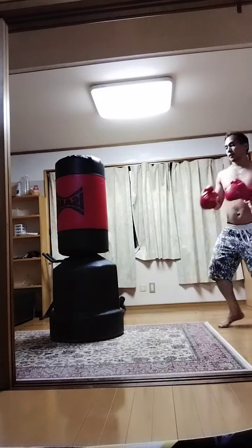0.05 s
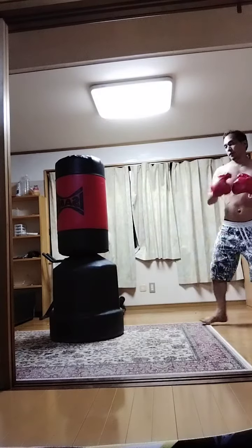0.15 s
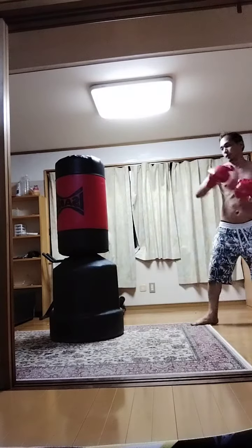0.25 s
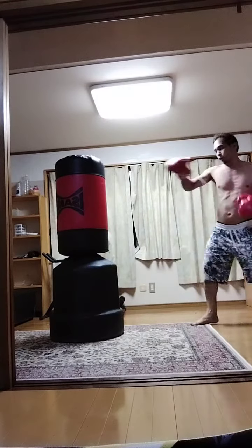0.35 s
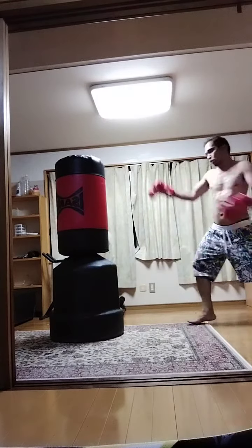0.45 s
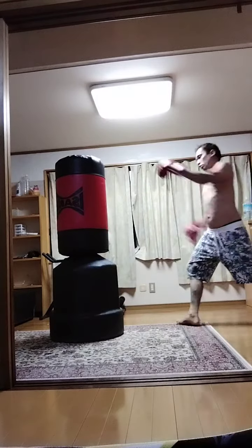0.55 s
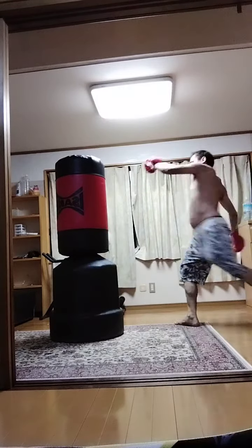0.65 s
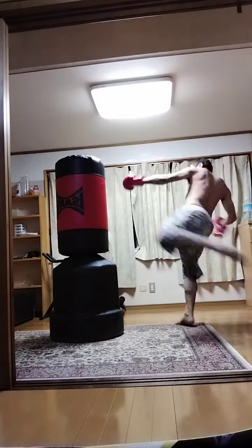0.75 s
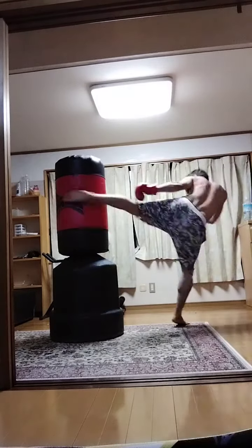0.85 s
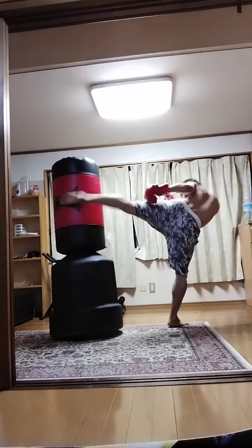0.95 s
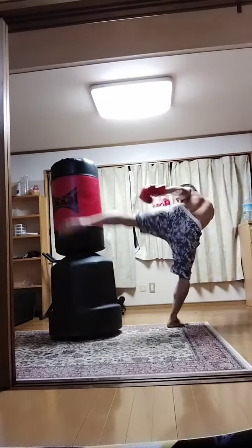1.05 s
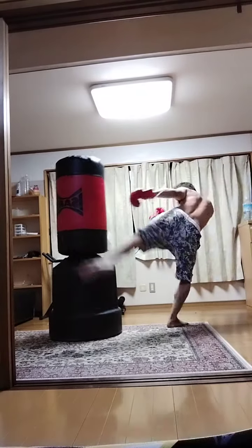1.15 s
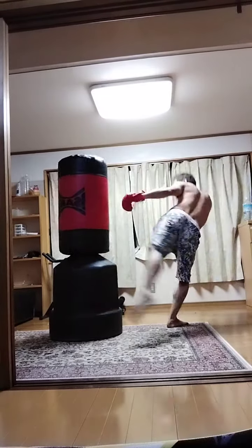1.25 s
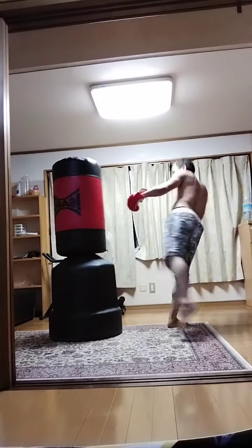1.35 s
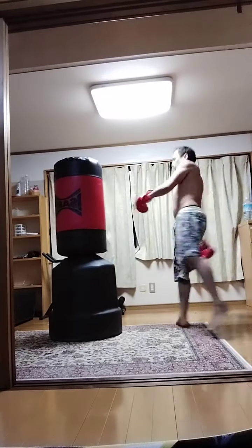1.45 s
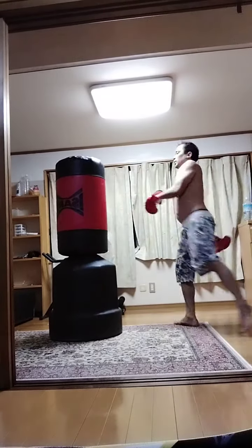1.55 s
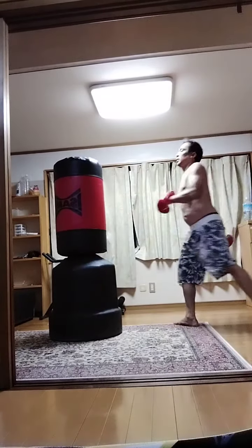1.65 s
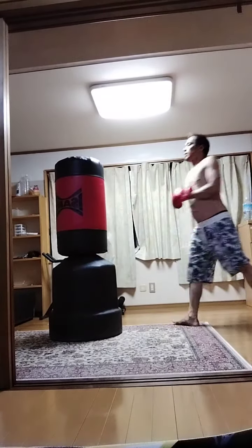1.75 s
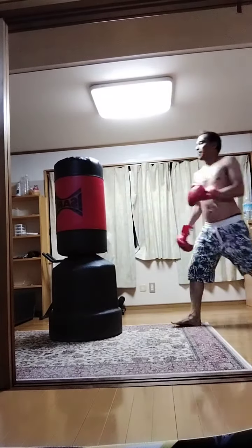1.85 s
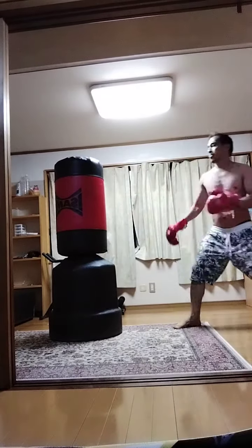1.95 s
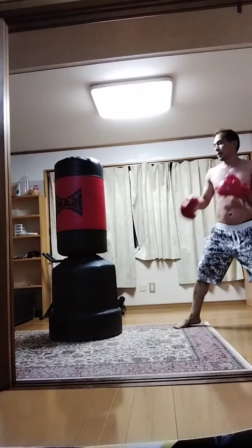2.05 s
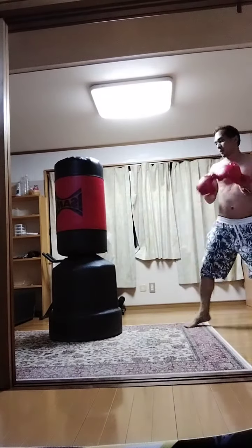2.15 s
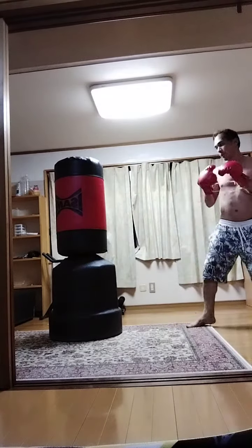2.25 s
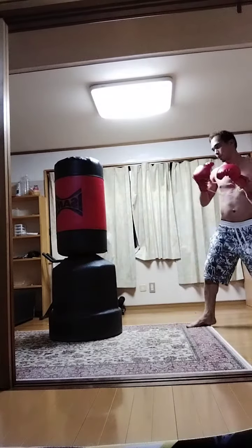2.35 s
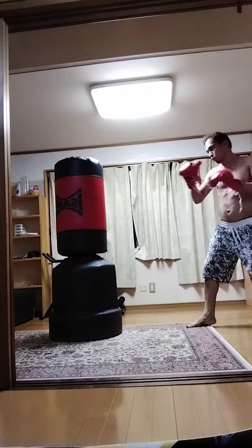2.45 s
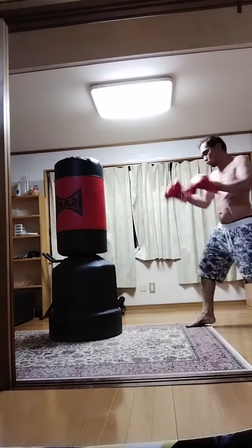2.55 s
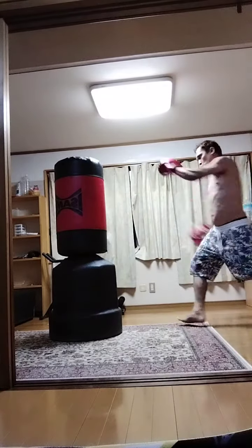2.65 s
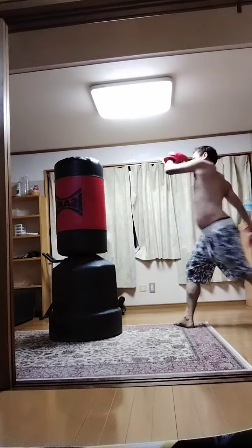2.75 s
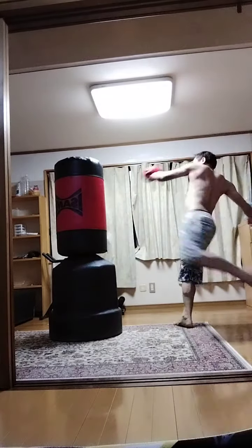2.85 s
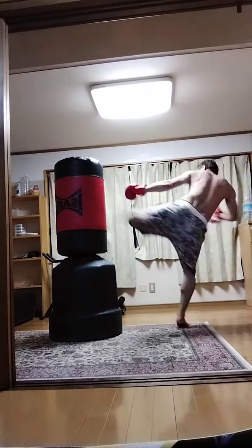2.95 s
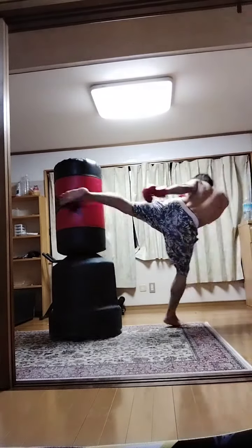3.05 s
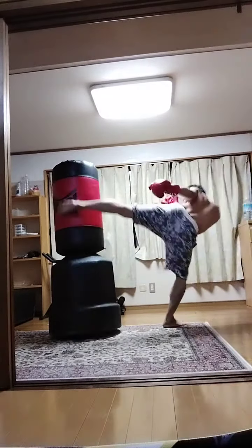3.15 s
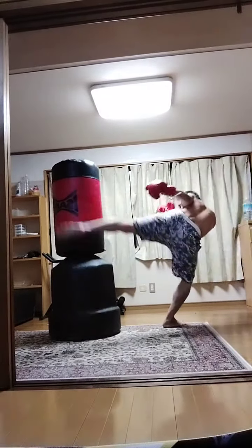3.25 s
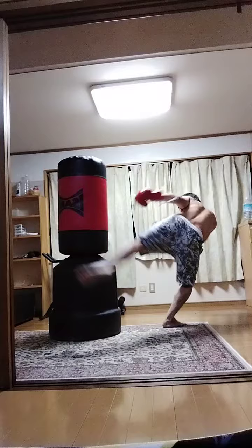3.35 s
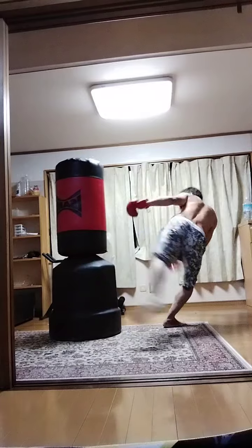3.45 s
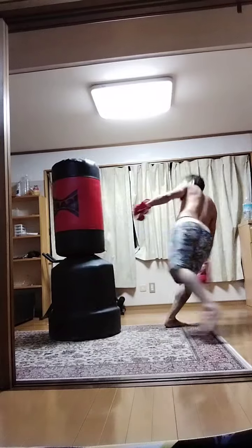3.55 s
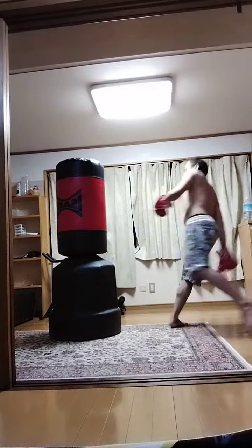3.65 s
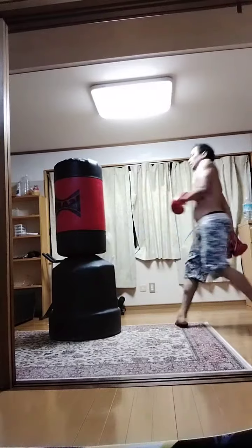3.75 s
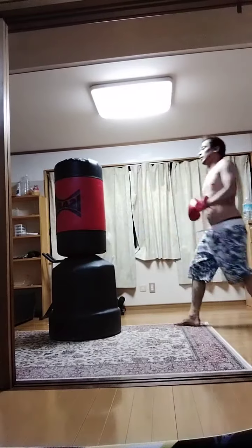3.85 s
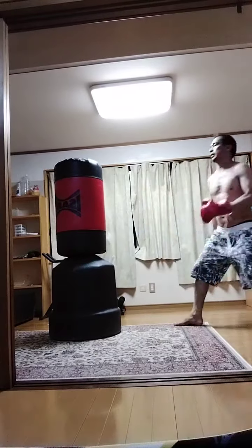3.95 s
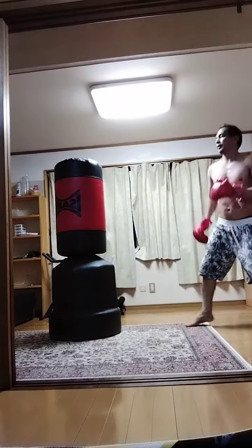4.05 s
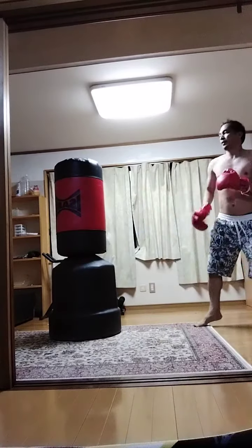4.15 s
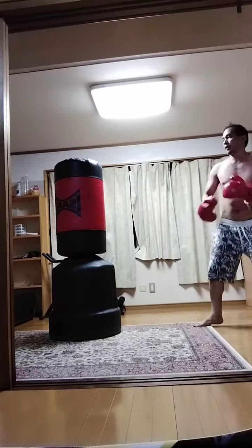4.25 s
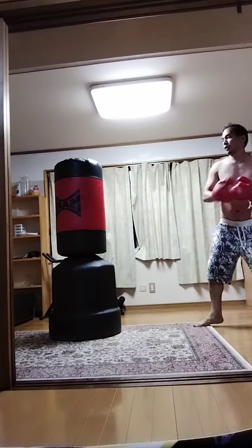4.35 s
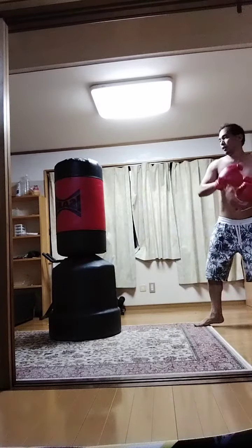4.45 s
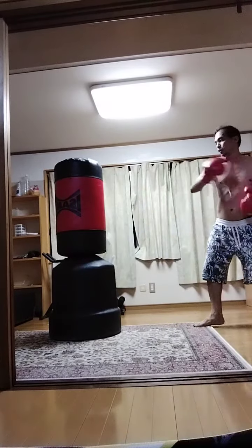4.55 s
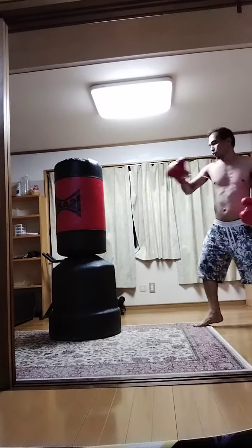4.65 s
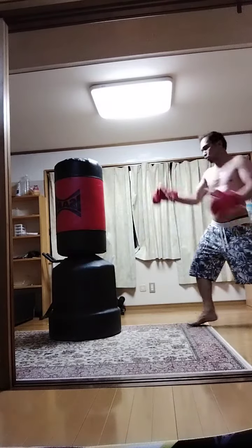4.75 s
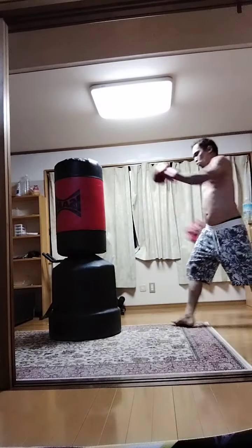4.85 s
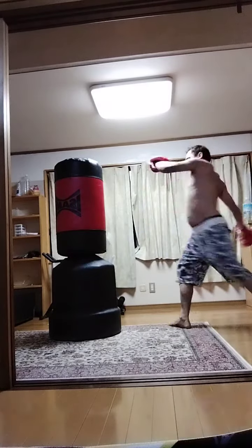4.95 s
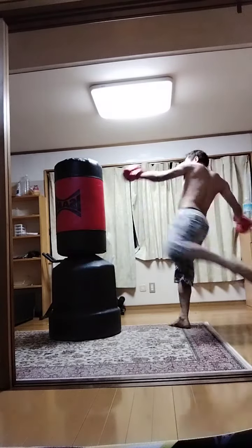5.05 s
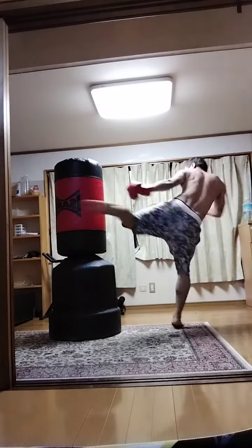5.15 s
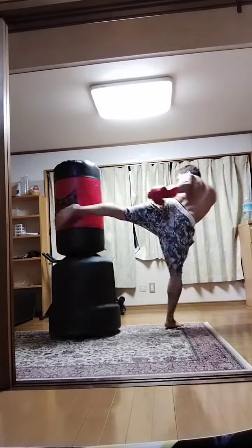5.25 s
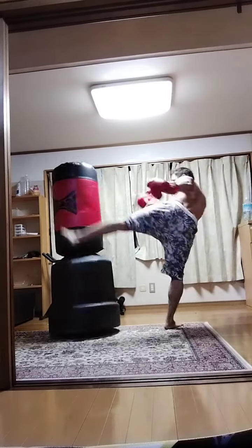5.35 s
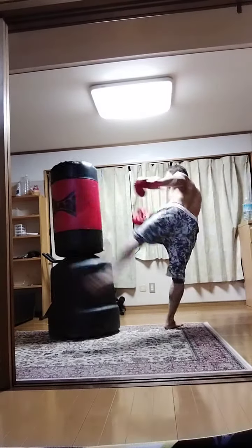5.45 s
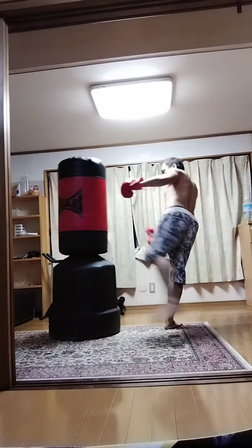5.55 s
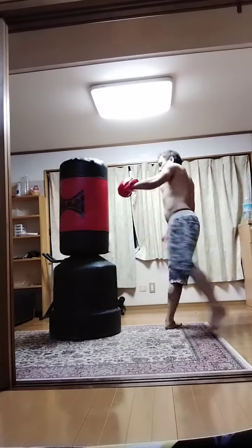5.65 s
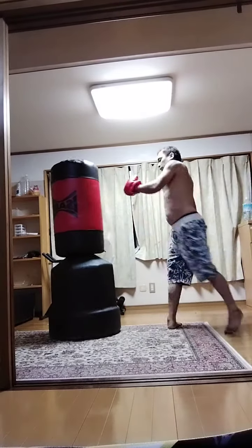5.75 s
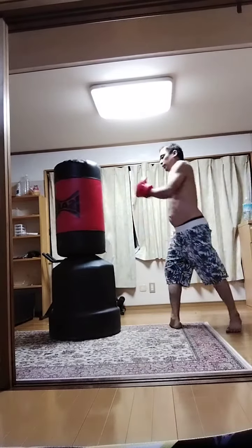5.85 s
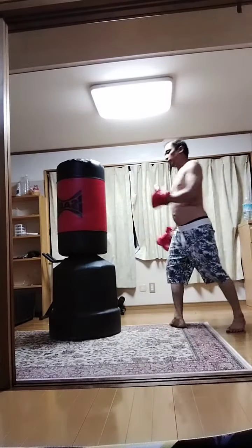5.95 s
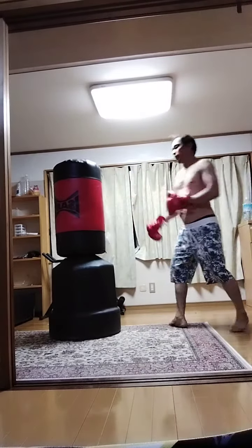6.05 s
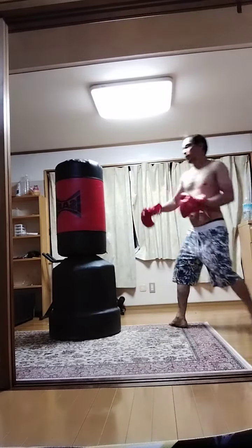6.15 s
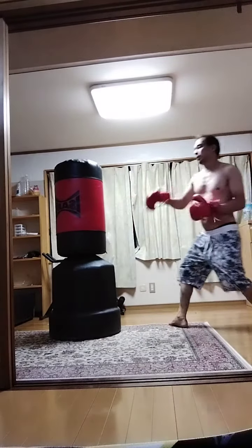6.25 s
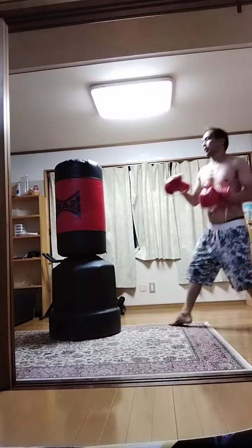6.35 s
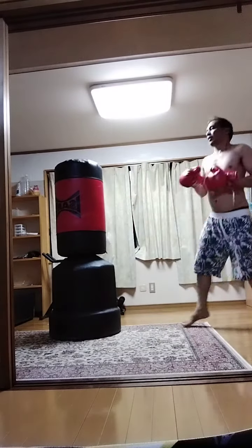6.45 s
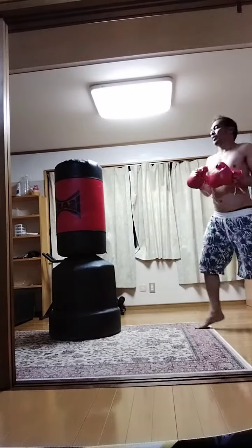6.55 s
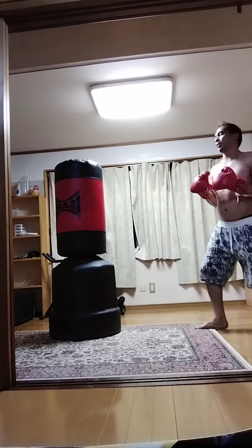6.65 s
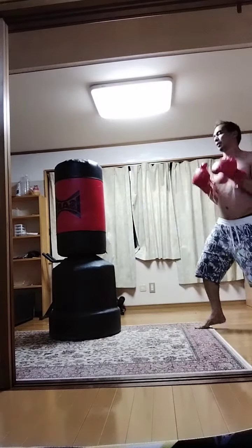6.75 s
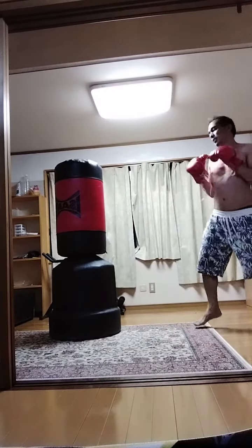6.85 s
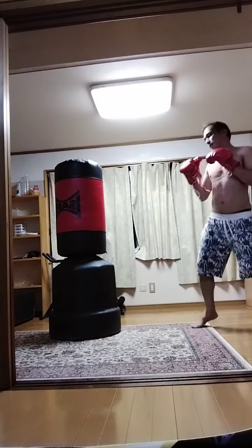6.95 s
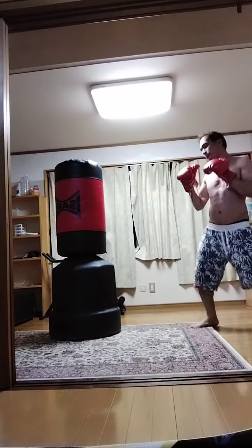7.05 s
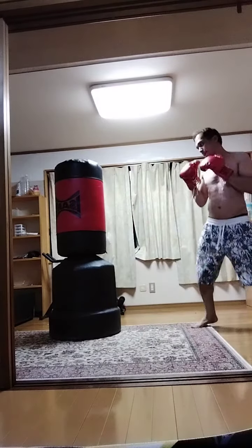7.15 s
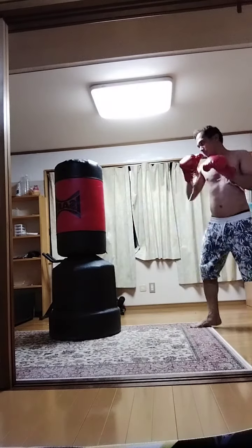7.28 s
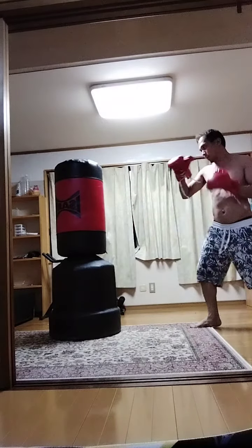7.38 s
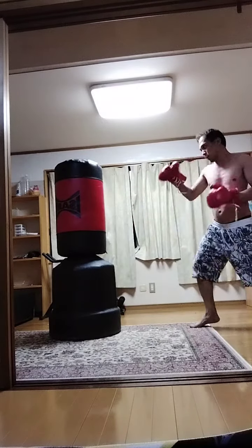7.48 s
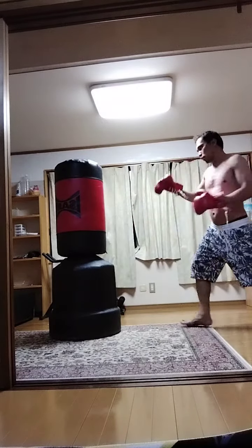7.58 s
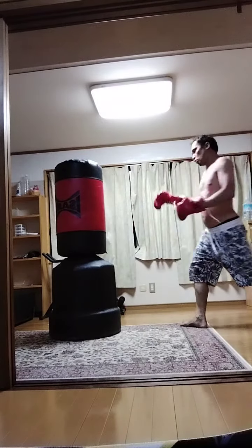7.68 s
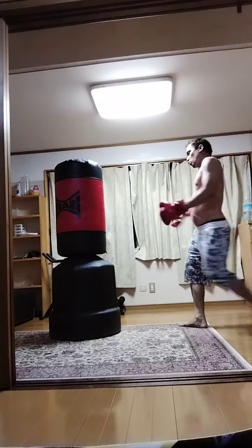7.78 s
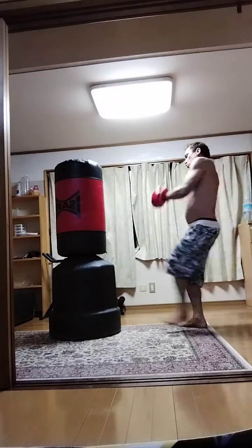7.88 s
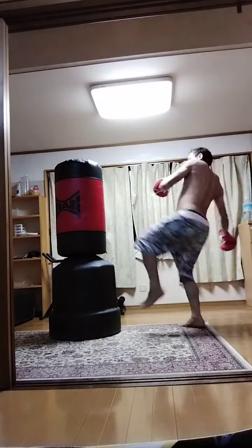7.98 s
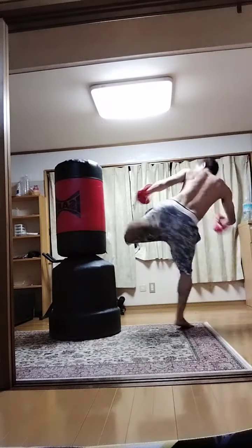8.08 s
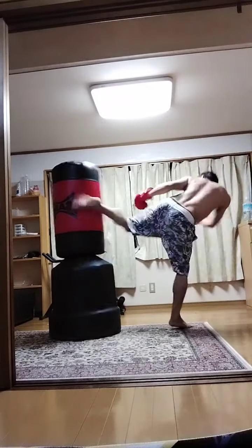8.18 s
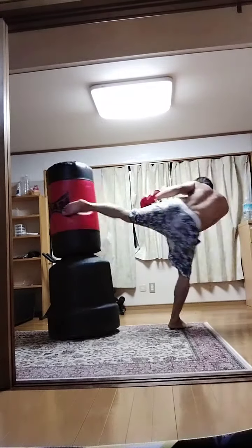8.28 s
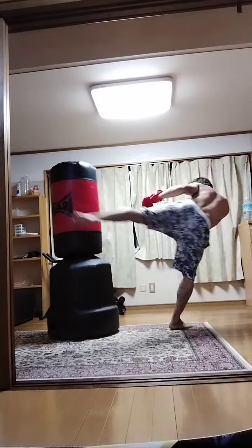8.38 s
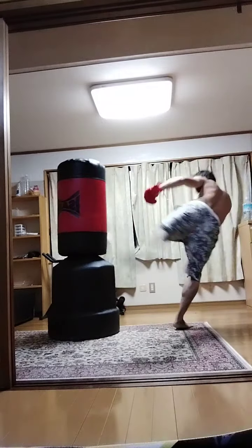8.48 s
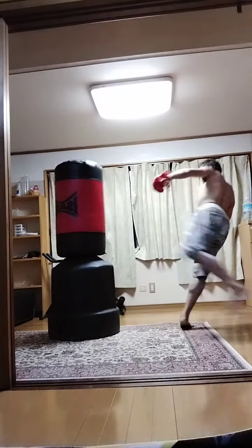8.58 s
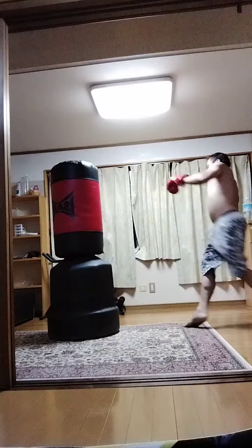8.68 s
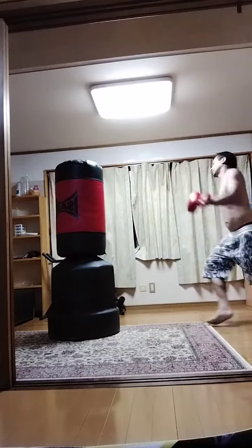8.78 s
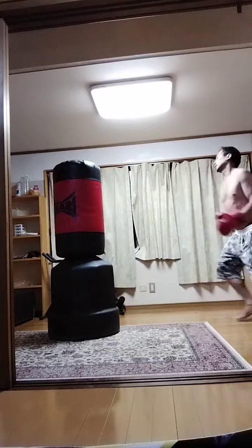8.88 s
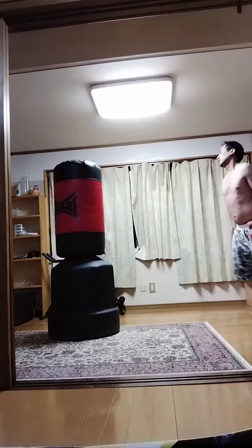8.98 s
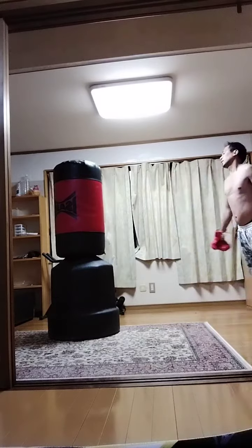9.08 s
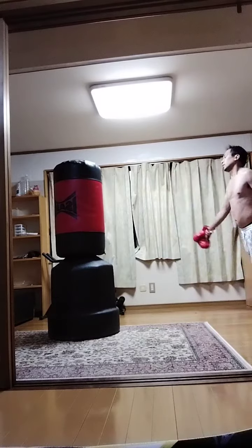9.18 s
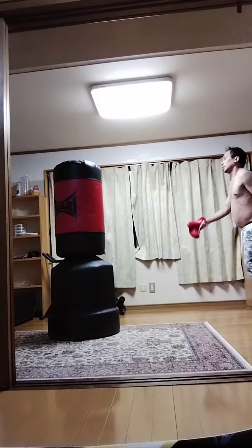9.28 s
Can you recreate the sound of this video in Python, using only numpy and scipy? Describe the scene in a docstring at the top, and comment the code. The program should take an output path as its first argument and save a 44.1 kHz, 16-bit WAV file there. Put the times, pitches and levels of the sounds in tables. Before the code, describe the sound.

Bare feet shuffle on a wooden floor as four spaced kicks smack a standing punching bag, its base knocking and rocking.

```python
"""Bare feet thud softly on a wooden floor, then four kicks land on a free-standing heavy bag in a small room.
Before each the kicker steps in and pivots; the shin slaps the cover and thumps the core. The dented
foam draws air back with a hiss while the filled base rocks and sloshes. Between kicks the feet thud,
tap and slide, boards groan, and shorts and gloves rustle. Reflections and standing waves colour it all."""
import sys
import numpy as np
from scipy import signal
from scipy.fft import rfft, irfft, next_fast_len
from scipy.io import wavfile
from scipy.ndimage import map_coordinates

SR = 44100
rng = np.random.default_rng(int(sys.argv[2]) if len(sys.argv) > 2 else 0)


def digitize_waveform(pressure):
    """Quantize a signal to 16-bit integers and store it at the path in sys.argv[1].

    Rows of a 2-D input are taken as channels; values are limited to [-1, 1].
    """
    field = np.atleast_2d(pressure).T
    bounded = np.clip(field, -1, 1)
    quanta = np.round(bounded * 32767).astype(np.int16)
    wavfile.write(sys.argv[1], SR, quanta)


N = 411004
T = np.arange(2 ** 15) / SR  # seconds within one event
CLOCK = np.arange(N) / SR  # seconds within the scene

# Event levels are relative to others of their kind.
# Kicks. Each row: start in seconds, push in dB, push pitch in Hz, then boom, knock and smack in dB.
KICKS = [(0.955, -4.5, 111, -15, -17.5, -21), (3.1006, -1.5, 133.5, -14.5, -16.5, -20),
         (5.284, -0.5, 138.5, -10.5, -13, -23.5), (8.2499, 0.5, 179.4, -16.5, -17.5, -26)]
# Skin cracking on the vinyl cover. Each row: start in seconds, level in dB.
SLAPS = [(0.955, -24), (0.9604, -14), (0.9738, -11.5), (3.099, -23), (3.105, -18.5), (3.1222, -23.5),
         (5.2851, -15), (5.299, -25), (8.25, -15), (8.2533, -13)]
# Distinct landings of the base's rim. Each row: start in seconds, level in dB, shell pitch in Hz.
RIM_LANDINGS = [(1.251, -40, 400), (1.431, -36.5, 595), (1.594, -37, 291), (3.131, -10.5, 760),
                (3.15, -15.5, 345), (3.73, -43, 530), (5.291, -13.5, 247), (5.314, -15.5, 364),
                (5.797, -33, 255), (5.905, -38, 229), (6.115, -36, 290), (8.254, -10, 327),
                (8.528, -32, 258)]
# Foam refilling. Each row: centre in seconds, level in dB, half length in seconds,
# tilt in dB per octave, loss per later swing in dB.
PUFFS = [(1.086, -33.5, 0.075, -3.5, 26.5), (3.274, -32.5, 0.1, -6.5, 29), (5.376, -26, 0.056, -4.5, 22.5),
         (8.359, -29.5, 0.078, -2, 43)]
# Heavier steps. Each row: start in seconds, level in dB, board pitch in Hz, heel knock in dB.
FOOTFALLS = [(.014, -28.5, 100.3, -23), (.054, -27, 143.4, -23), (.324, -30, 89.3, -8),
             (.714, -27, 93.4, -4.5), (1.913, -26, 163.4, -18), (2.558, -28, 118, -5.5),
             (2.645, -23, 108.4, -7.5), (2.721, -20.5, 123.6, -20), (3.889, -19.5, 148.8, -39),
             (4.3, -36.5, 112, -16.5), (6.254, -18.5, 130.5, -10.5), (6.646, -33.5, 158.7, -28),
             (7.031, -33, 152.5, -20.5), (7.359, -36.5, 155, -32), (8.784, -12, 105, -11),
             (8.835, -5, 135.4, -16), (9.068, -41.5, 119, -20)]
# Footwork before a kick. Each row: step time in seconds, its slide in dB, pivot time in seconds,
# its slide in dB, that slide's half length in seconds.
WINDUPS = [(0.578, -53.5, .722, -47.5, 0.039), (2.688, -48, 2.87, -43, 0.041),
           (4.948, -57.5, 5.045, -43, .035), (7.834, -47.5, 8.15, -51.5, 0.1)]
# Boards groaning under shifting weight. Each row: centre in seconds, level in dB, pitch in Hz.
GROANS = [(2.553, -39, 314), (2.676, -36.5, 309), (7.421, -52.5, 338)]
# Light taps of toes, gloves and boards, and ticks of the bag's rocking base.
# Each row: start in seconds, level in dB, treble in dB.
TAPS = [(0.327, -44, -38), (0.552, -35.5, -20), (1.434, -41, -15.5), (1.486, -30, -24), (1.71, -63, 1),
        (2.233, -46, -12), (2.638, -35, -55), (2.847, -31, -12), (2.933, -40.5, -14.5), (3.57, -49, -6),
        (3.696, -41.5, -17), (4.155, -32.5, -10.5), (4.482, -33.5, -19.5), (5.795, -39.5, -13),
        (6.114, -48.5, -16.5), (8.04, -37, -22), (8.103, -34.5, -23), (9.128, -44, -16.5)]
# Brief rubbing swishes: soles sliding, and once the swinging bag's hiss.
# Each row: centre in seconds, level in dB, half length in seconds.
SWISHES = [(0.045, -52, 0.086), (0.204, -55, .019), (1.504, -49, 0.042), (1.933, -60.5, 0.1),
           (2.092, -55.5, 0.041), (2.255, -60, 0.061), (3.969, -59.5, 0.23), (4.19, -46, 0.05),
           (4.527, -62.5, 0.033), (4.841, -64, 0.026), (5.656, -46, 0.077), (6.585, -54.5, 0.056),
           (6.742, -50.5, 0.071), (6.972, -56.5, 0.084), (7.278, -58.5, 0.023), (7.426, -61.5, 0.065),
           (8.786, -44, 0.063), (8.845, -38.5, 0.019)]

# Spectra of the sources. Each row: frequency in Hz, relative spectral density in dB.
BAG_BOOM = [(25, -15), (45, -12.5), (70, -2), (120, -6), (185, 4), (280, -11), (450, -20.5), (900, -27.5)]  # bag and floor together
BASE_KNOCK = [(120, -29), (250, -2.5), (340, -3.5), (480, -6.5), (620, -13.5), (1000, -18.5), (1400, -39),
              (3000, -50)]
COVER_SMACK = [(300, -16.5), (700, 3), (1000, 1), (1400, -6), (2000, 0), (2800, -2.5), (4000, -9.5),
               (7000, -16.5), (11000, -20.5), (16000, -31)]
SKIN_CRACK = [(400, -9), (1500, 4), (3200, 4.5), (5000, -14), (8000, -13), (12000, -10), (16000, -14.5)]
RIM_CLACK = [(400, -1), (750, 6), (1200, -10.5), (3000, -21), (8000, -20)]
FOAM_HISS = [(1500, -33), (3400, -9), (4500, -5), (5400, -2.5), (6700, -2.5), (8500, -2.5), (11000, -5.5),
             (16000, -15.5)]
BASE_SLOSH = [(30, -9.5), (70, 3.5), (130, 3.5), (250, -5), (450, -14.5), (750, -16.5), (1300, -28),
              (3000, -26.5), (8000, -45.5)]
BAG_SWAY = [(15, -4.5), (30, 1), (48, -7.5), (70, -28.5), (140, -50)]
FLOOR_THUD = [(30, -31), (55, -20), (80, 4), (120, 0.5), (180, 1), (260, -11), (400, -25), (800, -52.5)]
HEEL_KNOCK = [(150, -19), (320, 2.5), (450, -4), (700, -16.5), (1200, -26), (3000, -46)]
TAP_BODY = [(300, -41.5), (900, 2), (1500, -4.5), (2400, 2), (3400, -5.5), (5000, -15), (9000, -34.5)]
TAP_TREBLE = [(2500, -24), (5500, 3.5), (9000, -0.5), (16000, -10)]
RUBBING = [(200, 7.5), (700, 3.5), (1200, -5), (2400, 3), (3300, -0.5), (4500, -7.5), (8000, -13.5),
           (16000, -17)]
CLOTH_RUSTLE = [(300, 3), (1200, -3.5), (2600, 0.5), (3400, -2.5), (4500, -12), (6500, -11.5), (9000, -24),
                (16000, -24.5)]
STILL_ROOM = [(12, -45), (20, -9.5), (60, 0.5), (123, 6), (337, -10), (410, -13.5), (738, -20), (1260, -20),
              (2390, -26), (3070, -29.5), (4180, -38.5), (7520, -44), (12100, -35), (16000, -57)]

# Whistling resonances of the seams. Each row: frequency in Hz, width in Hz, level in dB.
SEAM_MODES = [(4650, 230, -5), (6500, 540, -1.5), (7540, 140, 0.5)]
# Standing waves of the room. Each row: frequency in Hz, width in Hz, level in dB.
ROOM_MODES = [(118.5, 12, -7.5), (241.6, 36, -2.5), (332.5, 18, -1.5), (519.3, 3.3, -5), (642, 13, -3.5),
              (662, 9, -12), (1050, 60, -9)]
# Reverberation. Each row: frequency in Hz, nominal time to fall 60 dB in seconds.
ROOM_T60 = [(60, 0.77), (150, 0.38), (400, 0.46), (1000, 0.46), (2500, 0.5), (6000, 0.32), (14000, 0.56)]
# Coherence of the diffuse field. Each row: frequency in Hz, left-right correlation.
COHERENCE = [(100, 0.94), (280, 0.86), (500, 0.49), (900, 0), (3000, 0.034), (8000, 0.11)]
# Balance of the microphones. Each row: frequency in Hz, left minus right in dB.
BALANCE = [(120, -0.6), (300, -0.5), (700, -0.5), (1400, 3.5), (3000, 6.5), (5500, 9), (9000, 8.5),
           (14000, 6)]


def kicks(push_t60=0.013, contact_t60=0.031, crack_t60=0.0035):
    """Impact excitation: the shin shoves the bag's wall inward; core, base and cover sound the room."""
    out = np.zeros((2, N))
    for s, push_db, hz, boom_db, knock_db, smack_db in KICKS:
        push = -np.sin(2 * np.pi * hz * T + 0.26) * strike(rise=0.00014, t60=push_t60)
        boom = amp(boom_db) * ring(BAG_BOOM, rise=0.0064, stretch=0.82)
        knock = amp(knock_db) * ring(BASE_KNOCK, rise=0.0065, stretch=0.76)
        contact = coloured(COVER_SMACK) * decay(contact_t60)
        smack = amp(smack_db) * (contact + ring(COVER_SMACK, rise=0.01))
        add(out, s, amp(push_db) * push + boom + knock + smack)
    for s, db in SLAPS:
        crack = coloured(SKIN_CRACK) * decay(crack_t60)
        echo = amp(-27) * ring(SKIN_CRACK, rise=0.0053, stretch=0.8)
        add(out, s, amp(db + 9.5) * (crack + echo))
    return out


def rocking(first_s=0.3, gap_s=0.062, scatter_s=0.029, shell_hz=376, spread_octaves=0.27, count=6):
    """Shell resonance: the rim clacks on the floor and the hollow plastic base rings briefly."""
    out, landings = np.zeros((2, N)), list(RIM_LANDINGS)
    for kick_s, _, _, boom_db, _, _ in KICKS:  # a run of light landings follows each kick
        for k, (late, higher) in enumerate(rng.standard_normal((count, 2))):
            s = kick_s + first_s + k * gap_s + np.sqrt(k) * scatter_s * late
            landings.append((s, boom_db - 32, shell_hz * 2 ** (spread_octaves * higher)))
    for s, db, hz in landings:
        shell = amp(1.5) * np.sin(2 * np.pi * hz * T) * strike(rise=0.00012, t60=0.019)
        clack = amp(-16) * coloured(RIM_CLACK) * decay(t60=0.035)
        hollow = amp(-8) * ring([(hz / 2, -10), (hz, 0), (2 * hz, -12)], rise=0.0019, stretch=0.43)
        add(out, s, amp(db) * (shell + clack + hollow))
    return out


def foam(whistle_db=-5.5, swing_s=0.265, swings=2):
    """Flow noise: dented foam refills through whistling seams, then more thinly as the bag swings."""
    def seams(hz):
        return sum(amp(db) / (1 + (2 * (hz - centre) / width) ** 2) for centre, width, db in SEAM_MODES)

    out = np.zeros((2, N))
    for s, db, half, tilt_db, loss_db in PUFFS:
        air = coloured(FOAM_HISS, tilt_db) + amp(whistle_db) * noise(seams)
        add(out, s - T.mean(), amp(db - 4.5) * air * swell(half, t60=0.34))
        for k in range(1, swings + 1):
            puff = coloured(FOAM_HISS, tilt_db=12.5) * swell(half=0.051, t60=0.56)
            add(out, s + k * swing_s - T.mean(), amp(db - k * loss_db) * puff)
    return out


def slosh_and_sway(slosh_db=-36.5, sway_db=-32):
    """Damped motion: each kick sets the base's filling sloshing, and the swaying bag moves deep bass."""
    slosh, sway = np.zeros(N), np.zeros(N)
    mean_boom_db = np.mean([kick[3] for kick in KICKS])
    for s, _, _, boom_db, _, _ in KICKS:
        age = np.maximum(CLOCK - s, 0)
        force = amp(boom_db - mean_boom_db)
        slosh += force * strike(rise=0.035, t60=3.19, age=age)
        sway += force * strike(rise=0.005, t60=0.72, age=age)
    lumps = amp(4.3 * wobble(rate=28, size=N))
    water = amp(slosh_db) * slosh * unit(lumps * coloured(BASE_SLOSH, size=N))
    return water + amp(sway_db) * sway * coloured(BAG_SWAY, size=N)


def feet(settle_s=0.057, settle_db=-10.5):
    """Loading of a floor: weight bends the boards, which thud or groan."""
    out = np.zeros((2, N))
    for s, db, hz, knock_db in FOOTFALLS:
        add(out, s, amp(db) * thud(hz, knock_db))
        add(out, s + settle_s, amp(db + settle_db) * board(hz=84.35))  # the full weight follows
    for step_s, _, pivot_s, _, _ in WINDUPS:
        add(out, step_s, amp(-37.5) * thud(hz=120, knock_db=-1.5))
        add(out, pivot_s, amp(-37) * thud(hz=86.5, knock_db=-8.5))
    for s, db, hz in GROANS:
        groan = noise(lambda f: 1 / (1 + ((f - hz) / 45) ** 4))
        add(out, s - T.mean(), amp(db - 4.5) * groan * swell(half=0.041, t60=0.35))
    return out


def thud(hz, knock_db):
    """Impact on a plate: the sole pats, the heel knocks, and the board and surrounding floor vibrate."""
    spot = [(f * np.sqrt(hz / 125), db) for f, db in FLOOR_THUD]  # a stiffer spot sounds higher
    pat = amp(-8) * coloured(HEEL_KNOCK) * strike(rise=0.002, t60=0.019)
    floor = amp(-9.5) * ring(spot, rise=0.008)
    heel = amp(-9) * ring(HEEL_KNOCK, rise=0.018, stretch=0.74)
    return board(hz) + floor + amp(knock_db) * (pat + heel)


def board(hz, cycles=36):
    """Free vibration: a bent floorboard swings at its natural frequency and dies away."""
    return np.sin(2 * np.pi * hz * T) * strike(rise=0.01, t60=cycles / hz)


def taps():
    """Brief impacts: toes, gloves and boards tap, and the bag's rocking base ticks."""
    out = np.zeros((2, N))
    direct = 1 + 3.6 * np.exp(-T / 0.0012)  # the contact stands above its echoes
    for s, db, treble_db in TAPS:
        body = ring(TAP_BODY, rise=0.00044, stretch=0.85)
        tick = amp(treble_db + 5) * ring(TAP_TREBLE, rise=0.0003, stretch=0.64)
        add(out, s, amp(db - 18.5) * direct * (body + tick))
    return out


def swishes(level_db=-1.5):
    """Friction noise: soles rub as they step in, pivot and shuffle; once the swinging bag hisses."""
    out = np.zeros((2, N))
    for step_s, step_db, pivot_s, pivot_db, half in WINDUPS:
        add(out, step_s - T.mean(), amp(step_db) * rub(half=0.036))
        add(out, pivot_s - T.mean(), amp(pivot_db) * rub(half, tilt_db=-2.5))
    for s, db, half in SWISHES:
        add(out, s - T.mean(), amp(db) * rub(half))
    return amp(level_db) * out


def rub(half, tilt_db=-2, grain_db=2):
    """Stick-slip: one grainy swish, as of a surface catching and letting go."""
    catching = amp(grain_db * wobble(rate=400, size=len(T)))
    return unit(catching * coloured(RUBBING, tilt_db)) * swell(half, t60=0.25)


def cloth(rest_db=-76.5, effort_db=18, lag_s=0.12, half_s=0.42):
    """Friction of fabric: shorts and gloves rustle most with the effort of each kick."""
    effort = sum(np.exp(-((CLOCK - s - lag_s) / half_s) ** 2) for s, *_ in KICKS)
    folds_db = 3 * wobble(rate=16, size=N)
    return amp(rest_db + effort_db * effort + folds_db) * coloured(CLOTH_RUSTLE, size=N)


def room(x, wall_db=-20, echoes=14):
    """Interference: close walls comb each microphone's treble; standing waves lift a few low pitches."""
    m = next_fast_len(N + SR // 2)
    hz = np.fft.rfftfreq(m, 1 / SR)
    walls = np.zeros((2, m))
    for side in walls:
        signs = rng.choice([-1, 1], echoes)
        delays_s = rng.uniform(0.002, 0.02, echoes)
        side[(delays_s * SR).astype(int)] = signs
    bounce = amp(wall_db) * hz ** 2 / (hz ** 2 + 500 ** 2)  # long waves pass round the furniture
    early = (1 + bounce * rfft(walls)) / np.sqrt(1 + echoes * bounce ** 2)
    standing = sum(amp(db) * 1j * hz * width / (centre ** 2 - hz ** 2 + 1j * hz * width)
                   for centre, width, db in ROOM_MODES)
    return irfft(rfft(x, m) * early * (amp(2) + standing), m)[:, :N]


def ring(spectrum, rise, stretch=1):
    """Reverberation of a blow: each octave dies at its own rate; stretch scales the decay times."""
    hz = np.fft.rfftfreq(len(T), 1 / SR)
    gain = shape(spectrum, hz)
    field, out = diffuse(hz) * gain, np.zeros((2, len(T)))
    for low in 20 * 2 ** np.arange(10):
        band = (hz >= low) & (hz < 2 * low)
        energy_share = np.sum(gain[band] ** 2) / np.sum(gain ** 2)
        if energy_share > 1e-6:
            fade = strike(rise, t60=stretch * along(ROOM_T60, low * np.sqrt(2)))
            out += unit(irfft(field * band) * fade) * np.sqrt(energy_share * np.mean(fade ** 2))
    return out


def swell(half, t60):
    """Energy storage: a bell-shaped stroke centred in T trails off with the room's decay."""
    retained = amp(-120 / (t60 * SR))  # share of the power left after one sample
    stroke = np.exp(-2 * ((T - T.mean()) / half) ** 2)
    power = signal.lfilter([1], [1, -retained], stroke)
    return np.sqrt(power / power.max())


def strike(rise, t60, age=T):
    """Transient envelope: builds with a time constant of rise seconds while it decays."""
    return (1 - np.exp(-age / rise)) * decay(t60, age)


def decay(t60, age=T):
    """Exponential damping: 60 dB lost in t60 seconds."""
    return amp(-60 * age / t60)


def wobble(rate, size):
    """Random modulation: a smooth curve with rate knots a second."""
    knots = rng.standard_normal(int(size * rate / SR) + 4)
    return map_coordinates(knots, [np.arange(size) * rate / SR], order=2)


def coloured(spectrum, tilt_db=0, size=len(T)):
    """Spectral shaping: noise that follows a tabulated spectrum."""
    return noise(lambda hz: shape(spectrum, hz, tilt_db), size)


def noise(gain, size=len(T)):
    """Random-phase synthesis: stereo noise of rms 1 with a given gain over frequency."""
    m = next_fast_len(size)
    hz = np.fft.rfftfreq(m, 1 / SR)
    return unit(irfft(diffuse(hz) * gain(hz), m)[:, :size])


def diffuse(hz):
    """Coherence of a diffuse field: a stereo spectrum with shared bass and unrelated treble."""
    mid, side = np.exp(2j * np.pi * rng.random((2, len(hz))))
    angle = np.arccos(np.clip(along(COHERENCE, hz), -1, 1)) / 2
    mid, side = np.cos(angle) * mid, np.sin(angle) * side
    return np.array([mid + side, mid - side])


def shape(points, hz, tilt_db=0):
    """Spectral envelope: its treble tilted by tilt_db an octave, falling steeply beyond its ends."""
    high_skirt = 1 + (hz / (2 * points[-1][0])) ** 4
    low_skirt = 1 + (points[0][0] / (2 * hz + 1)) ** 2
    return amp(along(points, hz) + tilt_db * np.log2(1 + hz / 1000)) / (high_skirt * low_skirt)


def along(points, hz):
    """Interpolation of (Hz, value) points on a logarithmic axis."""
    frequencies, values = np.transpose(points)
    return np.interp(np.log(hz + 1), np.log(frequencies), values)


def amp(db):
    """Amplitude ratio from decibels."""
    return 10 ** (np.asarray(db) / 20)


def unit(x):
    """Normalisation to rms 1."""
    return x / np.sqrt(np.mean(x ** 2) + 1e-20)


def add(track, s, sound):
    """Superposition of a sound on the track from s seconds."""
    start = round(s * SR)
    sound = sound[..., max(-start, 0):N - start]
    track[:, max(start, 0):][:, :sound.shape[-1]] += sound


def scene():
    """Superposition: bag and kicker sound in the room, over its still air."""
    still_air = amp(-57) * coloured(STILL_ROOM, size=N)
    bag = kicks() + rocking() + foam() + slosh_and_sway()
    return room(bag + feet() + taps() + swishes() + cloth()) + still_air


def record(dry):
    """Acoustic shadow dulls the right microphone; saturation rounds the peaks; the band ends steeply."""
    ceiling, top_hz, edge_hz = 0.9, 15850, 700
    m = next_fast_len(N + SR // 4)
    hz = np.fft.rfftfreq(m, 1 / SR)
    shading = amp(np.outer([0.5, -0.5], along(BALANCE, hz)))
    heard = irfft(rfft(dry, m) * shading, m)
    rounded = heard / (1 + np.abs(heard / ceiling) ** 6) ** (1 / 6)
    passband = np.clip((top_hz - hz) / edge_hz + 0.5, 0, 1)
    return irfft(rfft(rounded) * passband, m)[:, :N]


dry = scene()
out = record(dry)
digitize_waveform(out)
```